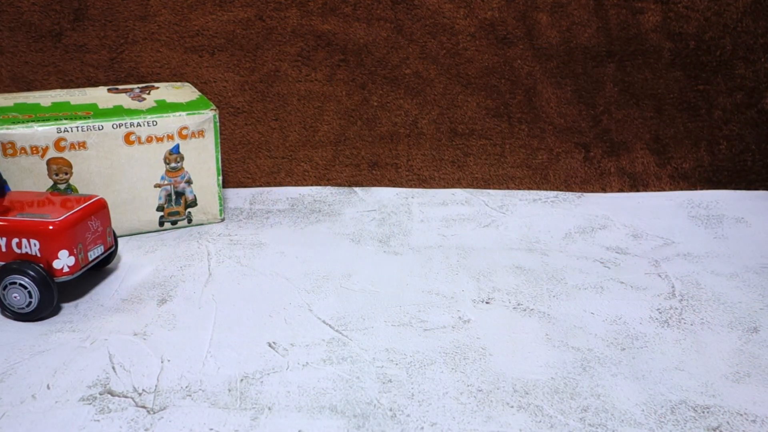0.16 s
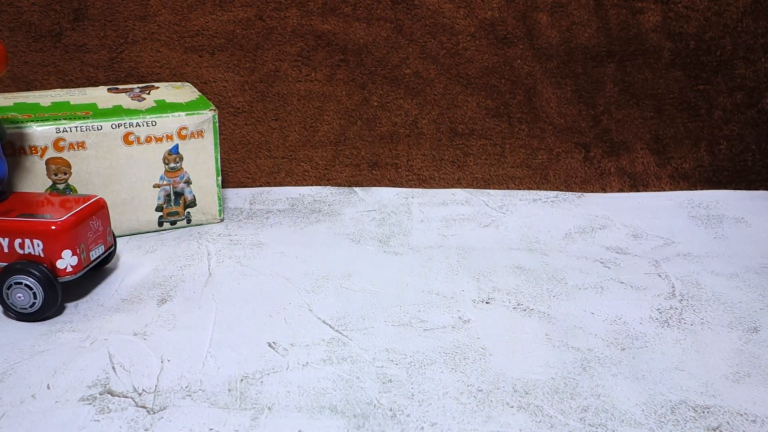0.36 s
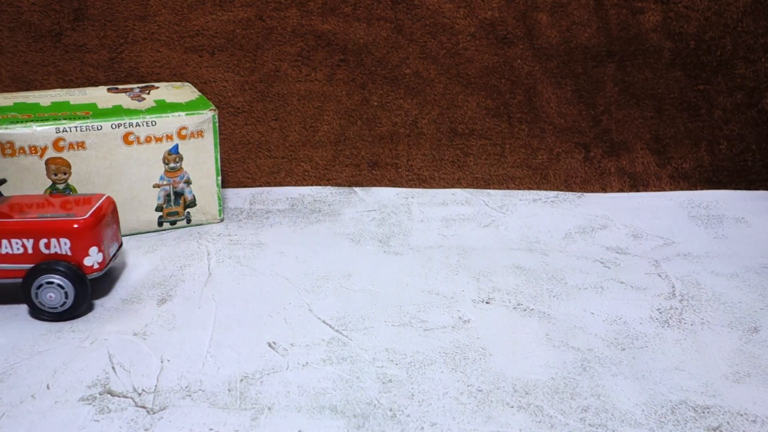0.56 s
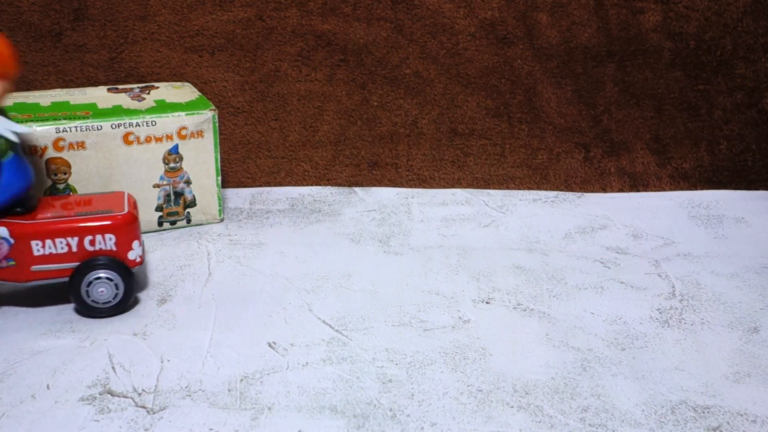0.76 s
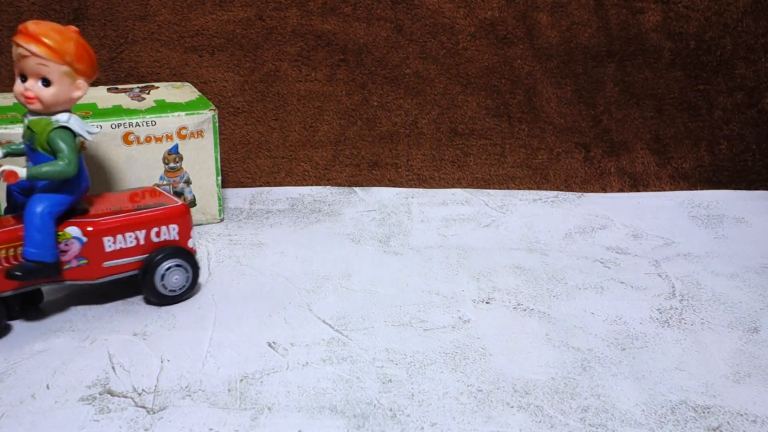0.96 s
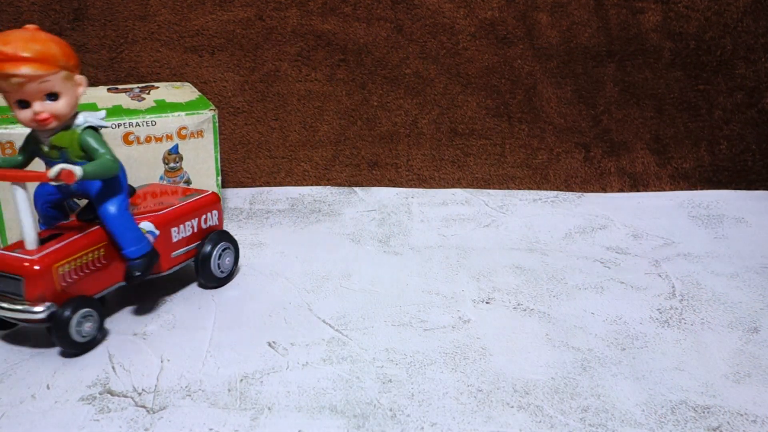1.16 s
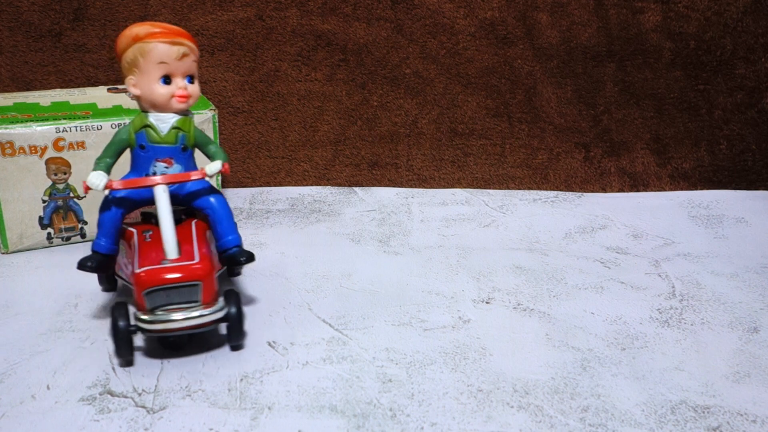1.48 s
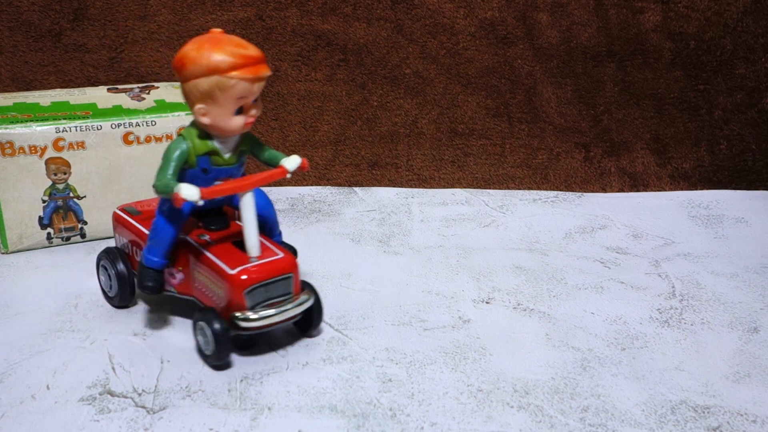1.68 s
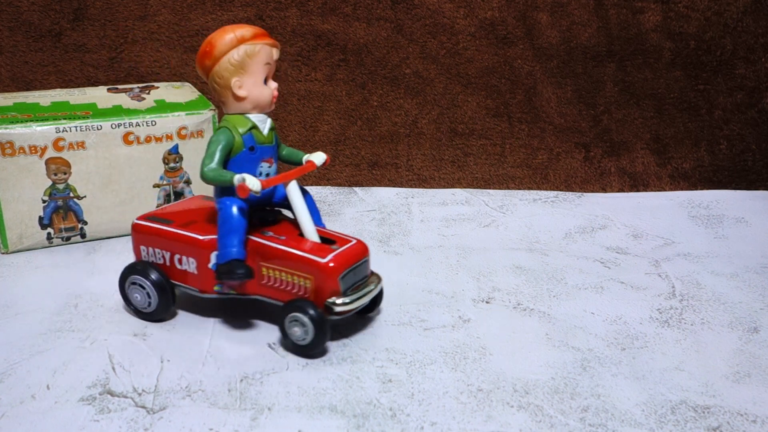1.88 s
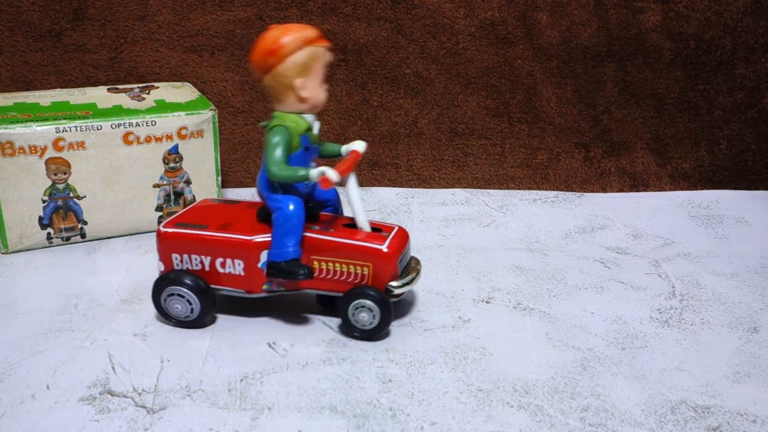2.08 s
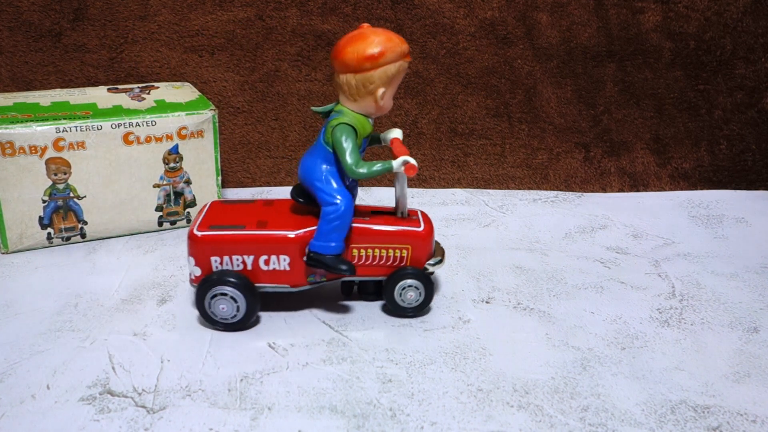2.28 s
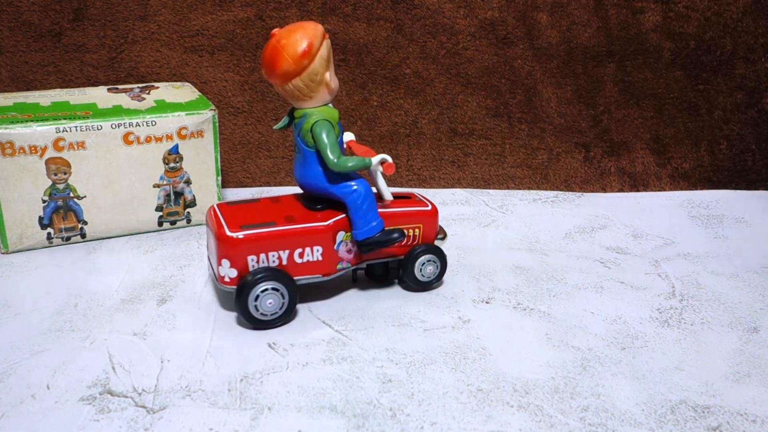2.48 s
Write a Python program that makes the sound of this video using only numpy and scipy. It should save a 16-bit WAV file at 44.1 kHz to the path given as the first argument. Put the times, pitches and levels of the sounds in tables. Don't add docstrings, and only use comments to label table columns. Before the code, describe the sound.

Toy car's gears chatter in a thin metal body, with quick bright bell strikes throughout

```python
import sys
import numpy as np
from scipy import signal
from scipy.fft import rfft, irfft
from scipy.io import wavfile
from scipy.ndimage import uniform_filter1d, map_coordinates

SR = 44100
rng = np.random.default_rng(int(sys.argv[2]) if len(sys.argv) > 2 else 0)


def convert_level_to_amplitude(level_db):
    exponent = np.asarray(level_db, float) / 20
    return 10 ** exponent


def unload_wav(signal):
    wavfile.write(
        sys.argv[1],
        SR,
        np.round(np.clip(np.atleast_2d(signal).T, -1, 1) * 32767).astype(np.int16),
    )


N = 116865


def level(x, db):
    return x * convert_level_to_amplitude(db) / np.sqrt(np.mean(x ** 2))


def shape(x, table, share=1, turn=0):
    f, p = np.fft.rfftfreq(N, 1 / SR) + 1, np.array(table, float)
    v = np.interp(np.log(f), np.log(p[:, 0]), p[:, 1])
    return irfft(rfft(x) * convert_level_to_amplitude(share * v) * np.exp(1j * turn * v), N)


def band(x, hz, width):
    return signal.lfilter(*signal.iirpeak(min(hz, .45 * SR), hz / width, fs=SR), x)


def fade(t, t60):
    return (t >= 0) * np.exp(-np.log(1000) * np.abs(t) / t60)


def hump(t, centre, half_s):
    return np.exp(-.5 * ((t - centre) / half_s) ** 2)


def walk(rate):
    k = int(SR / rate)
    held = np.repeat(rng.standard_normal(N // 1000)[:N // k + 1], k)[:N]
    return 1.7 * uniform_filter1d(uniform_filter1d(held, k), k)


def steady(x):
    power = uniform_filter1d(x ** 2, size=int(.04 * SR))
    return x * (np.mean(x ** 2) / power) ** (.6 / 2)


# frequency in Hz, level in dB.
ROOM_TONE = [(15, -57), (25, -26), (124, -7.5), (214, -9.5), (328, -10.5), (400, 1), (520, -71),
             (880, -120)]


def room_tone():
    mid, side = shape(rng.standard_normal((2, N)), ROOM_TONE + [(600, -53)])
    return level(mid + .12 * side * np.array([[1], [-1]]), -59)


def room(x, db):
    t, out = np.arange(SR // 3) / SR, np.zeros((2, N + SR))
    k = int(.3 * SR)
    window = np.sin(np.pi * np.arange(2 * k) / (2 * k))
    x = np.pad(x, (k, 2 * k))
    for i in range(0, N + k, k):
        tail = rng.standard_normal((2, len(t))) * fade(t - .002, .28)
        tail = tail / np.sqrt(np.sum(tail ** 2) / 2)
        tail = signal.lfilter(*signal.butter(2, 2290, "high", fs=SR), tail)
        piece = signal.fftconvolve((x[i:i + 2 * k] * window)[None], tail, axes=1)
        out[:, i:i + piece.shape[1]] += piece[:, :N + SR - i]
    return convert_level_to_amplitude(db) * out[:, k:k + N]


# frequency in Hz, lead of the left port in radians.
LEAD = [(0, 0), (950, 0.8242), (2670, 1.16), (3010, -1.2), (4310, 1.8), (5080, 0.54), (8610, 1.81),
        (10200, 2), (12100, 1.8), (12600, 1.6), (13300, 1), (15500, 1.5), (16100, -0.2), (16500, 0.2)]


def ports(x, pan_db):
    return np.array([shape(x * convert_level_to_amplitude(pan_db / 2), LEAD, 0, 0.92), x * convert_level_to_amplitude(-pan_db / 2)])


# frequency in Hz, left minus right in dB.
SHADE = [(60, 0.0), (110, 0.0), (200, 0.0), (380, -1.5), (700, -2.5), (1290, -5), (2380, -11), (4400, -12),
         (8120, -5.5), (15000, -10)]


def shade(x):
    return np.array([shape(x[0], SHADE, 0.33), shape(x[1], SHADE, -0.5)])


def sway(x, t):
    moved = t * SR + .4 * np.sin(2 * np.pi * t / 1.3)
    return np.array([map_coordinates(x[0], [moved], order=5, mode="mirror"), x[1]])


# centre in seconds, frequency in Hz, #
# level in dB, half length in seconds.
PANEL_BUZZES = [(0.106, 495.0, -39.5, 0.017), (0.155, 712, -32, 0.0086), (0.324, 2370, -40, 0.01),
                (0.33, 1890, -33, 0.0078), (0.337, 2743, -34, 0.0079), (0.387, 1268, -35.5, 0.015),
                (0.74, 445.5, -45, 0.017), (1.044, 5792.0, -39, 0.02), (1.146, 2734.0, -36.5, 0.014),
                (1.28, 958, -37, 0.029), (1.282, 3330, -40, 0.0084), (1.292, 3700, -40.0, 0.016),
                (1.37, 4500.0, -49, 0.0094), (1.371, 3720, -33, 0.016), (1.403, 2750, -35, 0.01),
                (1.558, 4360, -41, 0.017), (1.598, 1360, -33, 0.013), (1.637, 5930, -38, 0.0099),
                (1.694, 1345, -32.5, 0.011), (1.734, 1313, -37, 0.014), (1.807, 925.0, -38.5, 0.011),
                (1.81, 1370, -38.5, 0.026), (1.813, 1695, -37.5, 0.011), (1.866, 1679.0, -45, 0.034),
                (1.929, 2990, -33, 0.0071), (1.93, 1880, -38, 0.013), (1.937, 2700, -38.0, 0.018),
                (1.985, 707.6, -41, 0.11), (2.013, 947.0, -39.5, 0.044), (2.118, 1421.0, -42, 0.028),
                (2.122, 740, -43, 0.012), (2.125, 4230, -38, 0.039), (2.127, 4150, -45, 0.061),
                (2.137, 1668, -36.5, 0.023), (2.138, 947.0, -40.5, 0.028), (2.2, 3370, -38, 0.012),
                (2.236, 753.0, -34.5, 0.013), (2.291, 712, -34.5, 0.013), (2.327, 3768.0, -35, 0.0088),
                (2.333, 917, -33.5, 0.014), (2.347, 714.5, -40, 0.07), (2.349, 746, -42, 0.011),
                (2.355, 1679.0, -38, 0.013), (2.384, 3890, -40.0, 0.02), (2.467, 2713.0, -39.5, 0.022),
                (2.472, 1604, -43, 0.024), (2.48, 732.0, -36.5, 0.0098), (2.512, 956, -37.5, 0.038),
                (.2, 3690, -41.5, 0.021), (.2, 4900, -40, .015), (0.247, 6150, -46, 0.013),
               (0.493, 1308, -36.5, 0.017), (1.99, 3300, -44, 0.025), (2.128, 5000, -38, 0.024),
               (2.24, 4890, -43.5, .04), (2.328, 5300, -37, .015), (2.35, 4900, -43, .02),
               (2.5, 4860, -40, .04)]
# centre in seconds, level in dB, half length in
# seconds.
BELL_PINGS = [(0.35, -44, 0.019), (0.477, -43, 0.022), (.605, -39, .02), (.875, -40.5, 0.022),
              (1.095, -43.5, .015), (1.196, -46, 0.035), (1.408, -48, 0.023), (1.54, -46, .04),
              (1.796, -44, 0.016), (1.983, -44, 0.028), (2.08, -43, .05), (2.21, -51, 0.018),
              (2.547, -45.5, .03)]


def rattles(t):
    chance = uniform_filter1d(rng.standard_normal(N), size=150) * 12
    back = chance[::-1]
    bent = t + .006 * np.cumsum(back - uniform_filter1d(back, size=2000)) / SR
    buzz = ping = 0
    for s, hz, db, half in PANEL_BUZZES:
        buzz = buzz + convert_level_to_amplitude(db) * hump(t, s, max(half, .005)) * np.sin(2 * np.pi * hz * bent)
    for s, db, half in BELL_PINGS:
        ping = ping + convert_level_to_amplitude(db) * hump(t, s, max(half, .005))
    ping = ping * np.sin(2 * np.pi * 2733 * (t + bent) / 2)
    return convert_level_to_amplitude(1 + 4.5 * chance) * (buzz + ping)


# time in seconds, gear effort in dB, left minus right in dB,
# share of the floor pan in dB, share of the side panels in dB.
EFFORT = [(0, -28.5, -3.5, -3.5, -2.5), (.3, -30, -2, 2.5, 1), (.65, -30, -2.5, 1, -1),
          (1.0, -29.5, -2.5, -0.5, 0), (1.35, -30.5, -2, 2, -1.5), (1.6, -28, -3.5, -4.5, 0.5),
          (1.95, -29, -3, 2.5, 0), (2.3, -30, -5, 1, -2), (2.5, -31.5, -5, 4.5, 1.5),
          (2.65, -30.5, -4, -5, 2.5)]
# time in seconds, load in dB, lean into the body in dB.
CAM = [(.1, 1, 4), (0.198, 1.5, 4.5), (.33, 1, 2), (.48, 3, -2.5), (.75, 2, 1.5), (.83, 2, 2),
       (1.069, 4, 0), (1.28, 5, -20), (1.369, 3, 3), (1.551, 3, 1), (1.61, 3, 1), (1.73, 0, 4),
       (1.808, 4, -4), (1.9, 1, 1), (2.122, 3, 2.5), (2.23, 0, 3.5), (2.342, 3.5, 3.5), (2.48, 3.5, -4),
       (2.645, 4.5, -3)]
# frequency in Hz, width in Hz, level in
# dB.
BODY = [(451, 133, -6.5), (742, 87.4, 5), (798, 34, -16), (946, 44, 4), (1295, 210, 1.5), (1660, 84, 1.5),
        (1830, 184, -3), (2760, 66, -3.5),
        (3310, 260, -8), (3750, 260, -8), (4310, 220, -11), (4900, 320, -11), (5900, 600, -13)]
# frequency in Hz, level in dB.
CHATTER = [(190, -53), (330, -32), (729, 1.5), (1040, -10.5), (1290, -9.5), (2300, -7.5), (2750, -6.5),
           (7150, -5.5), (15800, -13.5)]


def gear_teeth():
    turn = np.cumsum(33 * (1 + 0.01 * walk(2.27))) / SR
    spread_db = 2.0 * np.minimum(rng.exponential(size=N), 2.5)
    size = convert_level_to_amplitude(spread_db + 1.2 * np.sin(2 * np.pi * turn))
    return level((rng.random(N) < 7000 / SR) * size * rng.standard_normal(N), 0)


def tin_body(t, teeth, pan_db, side_db):
    body = 0
    for hz, width, db in BODY:
        push = teeth + 1.2 * rng.standard_normal(N)
        ring = steady(band(band(push, hz, width), hz, 3 * width))
        if hz < 600:
            share_db = -3 * (t - 1.57)
        elif hz < 1050:
            share_db = pan_db
        else:
            share_db = side_db if hz < 3000 else 0
        body = body + ring * convert_level_to_amplitude(db + 1.3 * walk(13.53) + .3 * walk(6.4) + share_db)
    return body


def gears(t):
    when, effort_db, _, pan_db, side_db = np.array(EFFORT).T
    load = np.interp(t, when, effort_db)
    lean = 0
    for s, load_db, lean_db in CAM:
        press = hump(t, s, .014)
        load = load + load_db * press
        lean = lean + lean_db * press
    teeth = gear_teeth()
    body = tin_body(t, teeth, lean + np.interp(t, when, pan_db), lean + np.interp(t, when, side_db))
    white = shape(teeth + rng.standard_normal(N), CHATTER)
    chatter = 0
    for hz in 400 * 1.5 ** np.arange(10):
        chatter = chatter + steady(band(white, hz, hz / 2.5)) * convert_level_to_amplitude(1.8 * walk(12))
    return (level(body, -6.5) + level(chatter, -2.5)) * convert_level_to_amplitude(load)


# frequency in Hz, level in dB, t60 in seconds.
HIGH_RING = [(12548, -17, .3), (12570, 0, .7), (12612, -16, .15), (12902, -16, .1), (13160, -15, .06),
             (14225, -26, .08)]
# frequency in Hz, level in dB, t60 in seconds.
LOW_RING = [(7030, -6, .25), (7068, 0, .25), (7125, -8, .15), (7320, -9, .06), (4890, -20, .12),
            (7690, -14, .08), (2722, -20, .3)]
# time in seconds, level in dB,
# half length in seconds.
BOUNCES = [
    (.0715, -25, .004),
    (.345, -12, .003),
    (.631, -12, .004),
    (1.72, -10, .012),
    (2.202, -8, .002),
]
# frequency in Hz, width in Hz, level in dB.
JANGLE = [(12800, 700, 6), (7720, 850, 2), (14200, 760, -13), (9140, 1400, -12), (3600, 1050, -3.5),
          (1915, 270, -4), (2750, 14, -2)]


def ring_mode(u, hz, db, t60, hold):
    phase, detune, scatter = rng.random(3)
    quiver_db = uniform_filter1d(rng.standard_normal(SR // 3), size=200)[:len(u)] * 14 * 1.2
    after = u - hold
    damped = np.maximum(fade(after, .05), convert_level_to_amplitude(-8) * fade(after, .3))
    size = convert_level_to_amplitude(db + 5 + 2 * scatter + 1.5 + quiver_db) * fade(u, t60) * np.where(u < hold, 1, damped)
    return size * np.sin(2 * np.pi * (hz * (1 + .0008 * (2 * detune - 1)) * u + phase))


def stroke(t, start, crack_db, high_db, low_db, high_s, low_s):
    i = int(start * SR)
    u, ring = t[i:i + SR // 3] - start, 0
    for modes, db, hold in ((HIGH_RING, high_db, high_s), (LOW_RING, low_db, low_s)):
        for hz, mode_db, t60 in modes:
            ring = ring + ring_mode(u, hz, db + mode_db, t60, hold)
    choke_db = sum(db * hump(u + start, s, half) for s, db, half in BOUNCES)
    ring = ring * convert_level_to_amplitude(choke_db) * np.clip(u / 0.00056, 0, 1)
    noise = rng.standard_normal((2, SR // 3))[:, :len(u)]
    crack = band(noise[0] * fade(u, .032), 9000, 9900)
    shaken = noise[1] * fade(u, .24)
    jangle = sum(convert_level_to_amplitude(db) * band(shaken, hz, width) for hz, width, db in JANGLE)
    hit = ring + convert_level_to_amplitude(crack_db - 4.5) * (crack + convert_level_to_amplitude(-1) * jangle)
    return np.pad(hit, (i, N - i - len(u)))


STRIKE_S = [.0468, .3172, .5888, .8588, 1.1277, 1.3645, 1.3897, 1.6603, 1.9215, 2.1912, 2.4565]
# crack in dB, high
# ring in dB, low ring in dB.
STRIKES = [(-16, -24.5, -35.5), (-8, -22, -31.5), (-18, -20, -31.5), (-13, -19.5, -38), (-12, -24.5, -34.5),
           (-16, -45, -47), (-11, -27.5, -26), (-13, -17.5, -29), (-8.5, -24.5, -32), (-13, -22.5, -32),
           (-9.5, -29.5, -38)]
# high ring in seconds, low ring in seconds.
HOLDS = [(.07, .06), (.045, .045), (.036, .062), (.022, .04), (.012, .02), (.007, .007), (.035, .038),
         (.043, .05), (.008, .02), (.054, .085), (.018, .04)]


def bell(t):
    return sum(stroke(t, s, *row, *hold) for s, row, hold in zip(STRIKE_S, STRIKES, HOLDS))


def scene():
    t = np.arange(N) / SR
    pan = np.interp(t, *np.array(EFFORT).T[[0, 2]])
    pan = pan - pan.mean()
    whirr = gears(t)
    near = shade(ports(whirr + rattles(t), pan) + room(whirr, -1))
    rings = bell(t)
    near = near + ports(rings, pan - 8) + room(rings, -10) * convert_level_to_amplitude(np.array([[-2.5], [2.5]]))
    near = sway(near, t)
    low_cut = signal.cheby2(7, 55, 340 * 0.73, "high", fs=SR, output="sos")
    return signal.sosfilt(low_cut, near) + room_tone()


def band_limit(x):
    return signal.sosfilt(signal.butter(12, 16990, fs=SR, output="sos"), x)


def record(dry):
    t = np.arange(N) / SR
    dip = sum(fade(t - s + .003, .02) for s in STRIKE_S)
    dip = uniform_filter1d(uniform_filter1d(dip, size=130), size=130)
    ceiling = .85
    top_cut = signal.ellip(12, .3, 65, 15750, fs=SR, output="sos")
    mix = signal.sosfilt(top_cut, ceiling * np.tanh(dry / ceiling))
    return band_limit(mix * convert_level_to_amplitude(-6 * dip))


dry = scene()
out = record(dry)
unload_wav(out)
```